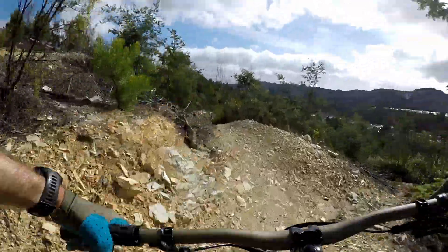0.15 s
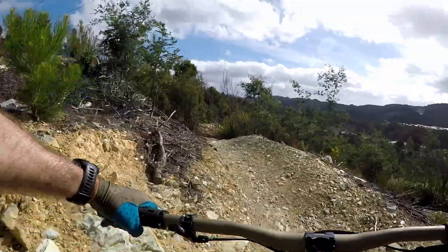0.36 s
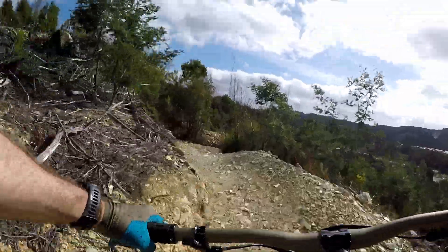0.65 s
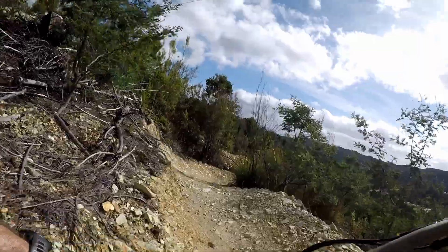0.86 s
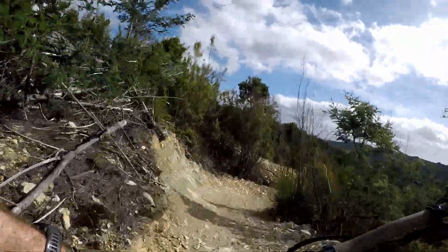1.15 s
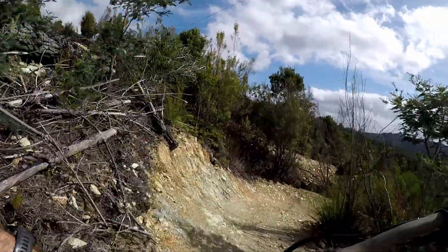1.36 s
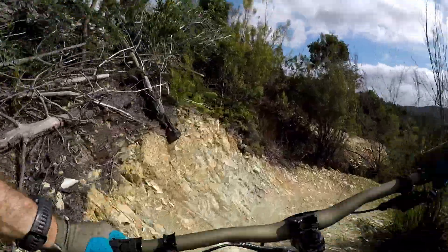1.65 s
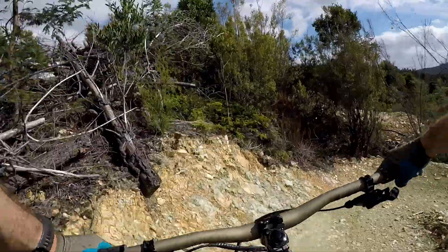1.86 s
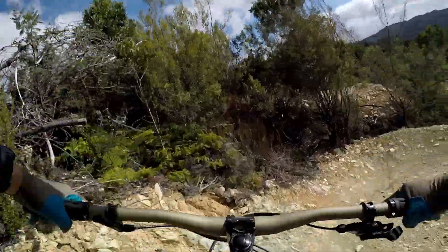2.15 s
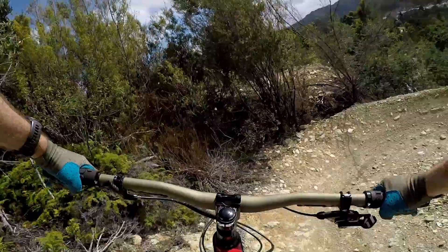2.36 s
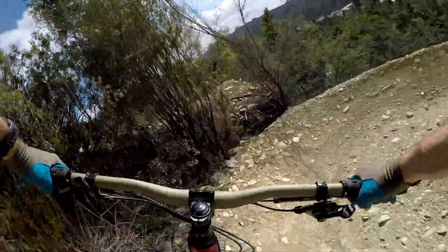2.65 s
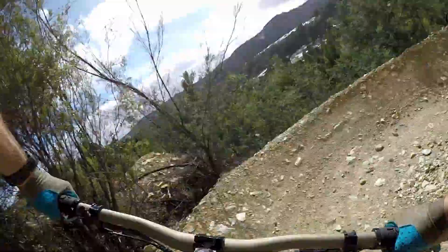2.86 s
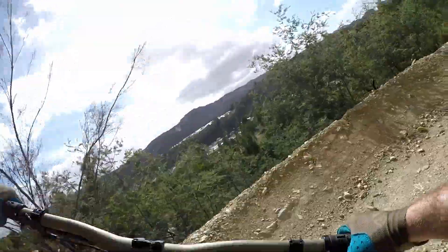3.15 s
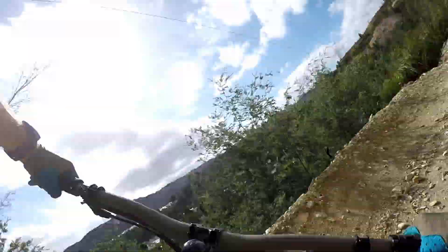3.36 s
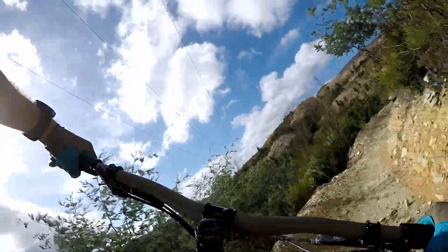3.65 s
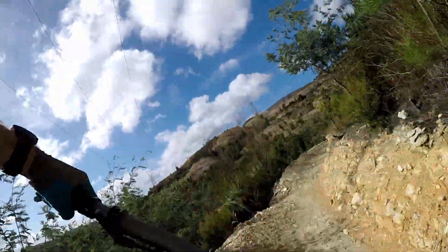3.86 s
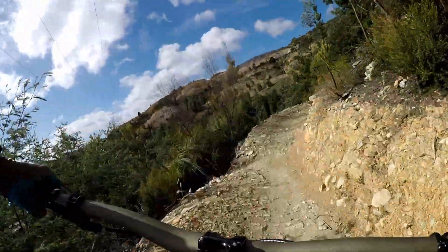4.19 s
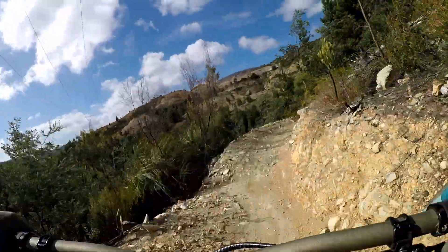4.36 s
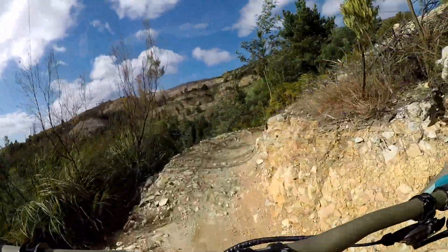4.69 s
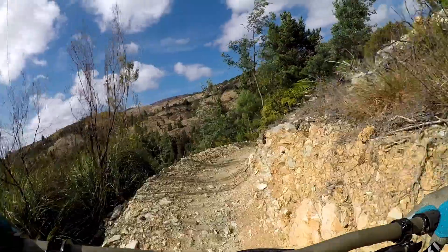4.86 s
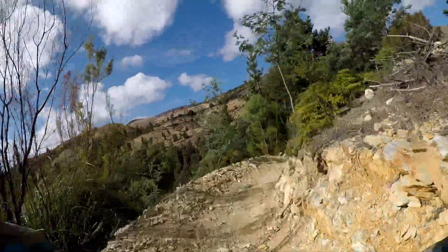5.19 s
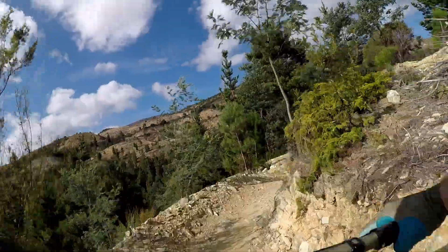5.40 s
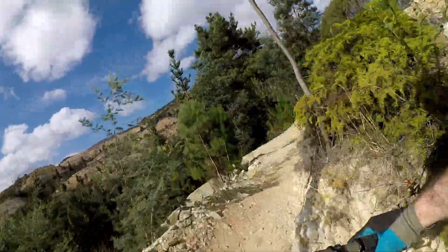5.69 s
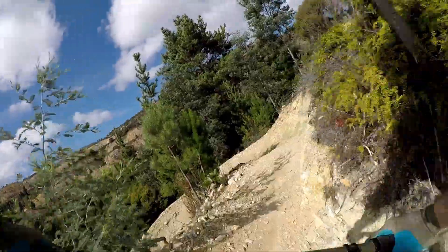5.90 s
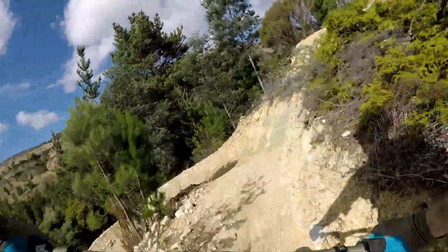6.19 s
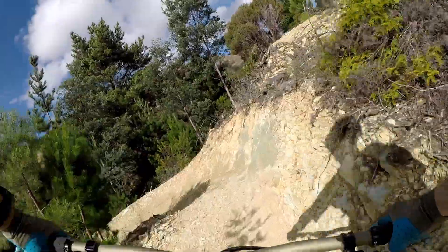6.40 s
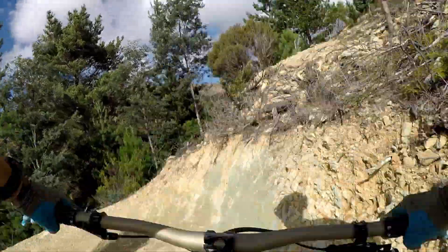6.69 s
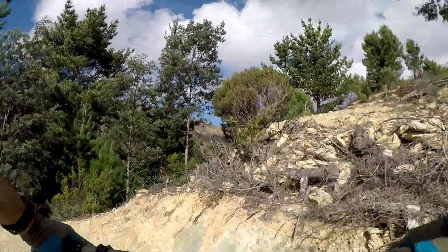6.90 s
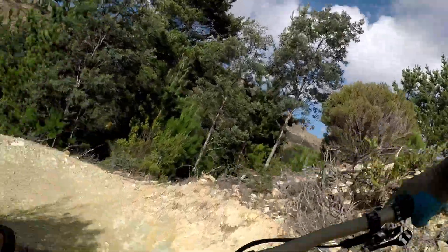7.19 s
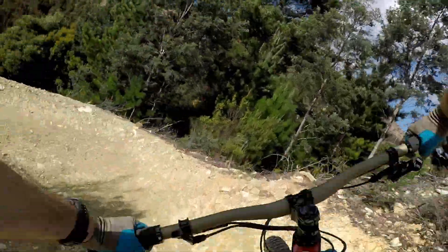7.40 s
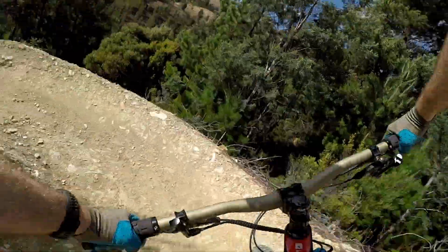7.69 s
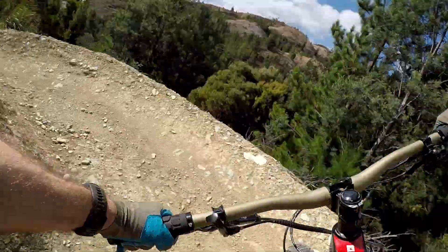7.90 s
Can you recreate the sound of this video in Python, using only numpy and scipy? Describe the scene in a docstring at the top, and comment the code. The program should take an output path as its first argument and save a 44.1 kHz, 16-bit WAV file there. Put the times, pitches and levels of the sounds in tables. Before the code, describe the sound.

Wind rumbles and loose stones crunch under bike tyres as bumps thud sharply; the hub later ticks rapidly before several heavy knocks.

```python
"""A mountain bike coasts down a gravel trail, heard from a camera on the rider's chest.
Bumps knock the camera mount (dispersed thuds, noise cracks) over wind buffeting and tyre crunch (shaped noise);
by 1.15 s the image closes to mono. From about 3 s the tyres rasp through the turns (noise into resonances).
The image widens again after 4.25 s and the freehub buzzes (clicks into resonances); hard knocks come near 7 s.
Stones ping off the frame throughout, and a limiter ducks the loudest peaks."""
import sys
import numpy as np
from scipy import signal
from scipy.fft import rfft, irfft, next_fast_len
from scipy.io import wavfile
from scipy.ndimage import uniform_filter1d, minimum_filter1d, map_coordinates

SR = 44100
rng = np.random.default_rng(int(sys.argv[2]) if len(sys.argv) > 2 else 0)


def file_out(sig):
    """Save sig as 16-bit WAV at sys.argv[1]."""
    # one column per channel
    cols = np.atleast_2d(sig).T
    # limit, then scale
    lim = np.clip(cols, -1, 1)
    pcm = np.round(lim * 32767).astype(np.int16)
    wavfile.write(sys.argv[1], SR, pcm)


N = 355005

# head wind, which follows the speed of the bike: (t/s, strength/dB)
WIND = [(0, -24.5), (.55, -22.5), (1.15, -23.5), (1.7, -22), (2.7, -25), (3.05, -26), (3.55, -29.5),
        (4.3, -34), (4.65, -33), (5.6, -33.5), (6.6, -38.5), (7.3, -33.5), (8.05, -33.5)]
REFERENCE_WIND_DB = -30  # wind strength at which wind-dependent levels take their base values
# stereo image: (t/s, width 0-1, where 0 is mono)
WIDTH = [(0, 0.99), (.4, 0.22), (.8, 0.06), (1.15, 0), (4.25, 0), (4.5, 0.37), (5, 0.62), (5.5, 0.85),
         (8.05, 0.87)]


def amp(db):
    """Logarithmic level: decibels to an amplitude ratio."""
    return 10 ** (np.asarray(db) / 20)


def unit(x):
    """Normalisation: scale to an rms value of 1."""
    return x / np.sqrt(np.mean(x ** 2) + 1e-20)


def along(points, hz):
    """Interpolation of (f/Hz, value) points along a logarithmic frequency axis."""
    f, v = np.transpose(points)
    return np.interp(np.log(hz + 1), np.log(f + 1), v)


def curves(rows):
    """Linear interpolation in time: one value per sample for each column after t/s."""
    s, *columns = np.transpose(rows)
    return [np.interp(np.arange(N) / SR, s, column) for column in columns]


def wobble(rate):
    """Slow random modulation: a smooth curve through `rate` Gaussian knots per second."""
    knots = rng.standard_normal(int(N * rate / SR) + 4)
    return map_coordinates(knots, [np.arange(N) * rate / SR])


def filtered(x, response):
    """Linear filtering: the spectrum of x times a complex response of frequency."""
    n = x.shape[-1]
    padded = next_fast_len(n + 8192, real=True)  # room for the filter's tail
    spectrum = rfft(x, padded) * response(np.fft.rfftfreq(padded, 1 / SR))
    return irfft(spectrum, padded)[..., :n]


def resonate(x, modes):
    """Modal resonance: parallel second-order modes (f/Hz, width/Hz, level/dB) of alternating sign."""
    def response(f):
        total = 0
        for k, (centre, width, db) in enumerate(modes):
            damping = 1j * f * width
            total = total + (-1) ** k * amp(db) * damping / (centre * centre - f * f + damping)
        return total
    return filtered(x, response)


def fade(t, t60):
    """Exponential decay, 60 dB down at t60."""
    return np.exp(-np.log(1000) * t / t60)


def swell(s, length):
    """Gaussian envelope: height 1 at time s, `length` seconds wide at half height."""
    return .5 ** ((2 * (np.arange(N) / SR - s) / length) ** 2)


def band(f, hz, octaves):
    """Gaussian band-pass gain around hz on a logarithmic frequency axis."""
    return np.exp(-.5 * (np.log2((f + 1) / hz) / octaves) ** 2)


def add(track, s, sound):
    """Superposition: mix a sound into a track at time s."""
    start = round(s * SR)
    sound = sound[..., max(0, -start):]
    part = track[..., max(0, start):][..., :sound.shape[-1]]
    part += sound[..., :part.shape[-1]]


def noise():
    """Two uncorrelated white noises."""
    return rng.standard_normal((2, N))


def contacts(rate, scatter_db, bed_db):
    """Random impact process: impulses of very unequal size over a bed of noise for countless tiny contacts."""
    size = amp(scatter_db * np.minimum(rng.standard_exponential(N), 4))
    impacts = (rng.random(N) < rate / SR) * size * noise()
    return unit(impacts) + amp(bed_db) * noise()  # bed level is relative to the impacts


def patchy(x, depth_db):
    """Time-frequency modulation: smooth random gain patches with an rms depth in dB."""
    z = signal.stft(x, nperseg=512)[2]
    field = uniform_filter1d(rng.standard_normal(z.shape[1:]), size=5, axis=0)
    field = uniform_filter1d(field, size=7, axis=1)
    return signal.istft(z * amp(depth_db * unit(field)), nperseg=512)[1][:, :N]


def spread(pair, spectrum):
    """Interchannel coherence: colour two unrelated signals as mid and side; the mid has rms 1."""
    # likeness of left and right: (f/Hz, correlation -1 to 1)
    likeness = [(30, 0.99), (110, 0.44), (380, 0.41), (700, -0.68), (1280, -0.41), (2300, 0.3), (3600, 1),
                (5400, 0.3), (8500, -0.53), (15000, -0.2)]

    def response(hz):
        angle = np.arccos(np.clip(along(likeness, hz), -1, 1)) / 2
        return amp(along(spectrum, hz)) * np.array([np.ones_like(hz), np.tan(angle)])

    mid, side = filtered(pair, response)
    return np.array([mid + side, mid - side]) / mid.std()


def roughness():
    """Ground excitation: the rise in dB that rough stretches of trail bring."""
    # rough stretches that shake the frame: (t/s, length/s, rise of the rumble/dB)
    ruts = [(0.576, 0.16, 11), (1.4, 0.13, 9), (2.23, 0.12, 17), (2.406, 0.16, 9.5), (2.72, 0.33, 14),
            (3.382, 0.074, 13), (3.804, 0.059, 8.5), (4.302, 0.16, 6), (4.87, 0.15, 6), (5.298, 0.86, 1.5),
            (5.646, 0.032, 10), (7.262, 0.057, 13.5)]
    return sum(db * swell(s, length) for s, length, db in ruts)


def tyres():
    """Granular crushing: knobs crush stones of four sizes under a load that flutters with the ground."""
    # how hard the tyres press into the gravel: (t/s, load level/dB)
    load = [(0, -50.5), (.12, -49), (.5, -41), (.78, -41), (1.45, -42), (2.15, -46), (2.45, -43),
            (2.7, -34.5), (2.95, -42), (3.6, -41), (3.83, -49), (4.17, -41.5), (4.45, -47), (4.65, -43),
            (4.92, -47.5), (5.45, -43.5), (7.7, -41), (8.05, -37.5)]
    # fine dust: (t/s, hiss level/dB)
    dust_hiss = [(0, -51.5), (.6, -59.5), (2.2, -56), (3.2, -56), (3.45, -49), (3.85, -57), (4.4, -57.5),
                 (4.63, -50), (4.9, -51.5), (4.95, -46), (5.4, -42), (7.3, -39), (7.7, -42.5),
                 (7.97, -38.5)]
    # relative spectra from coarse stones to dust: (f/Hz, level per Hz/dB)
    crunch_spectrum = [(200, 0), (450, 1.5), (750, -1), (1050, -3.5), (1350, -7), (1800, -11), (3500, -50)]
    gravel_spectrum = [(800, -8), (1450, 3.5), (1850, 4), (2350, 3), (2700, -1), (3050, 0), (3700, -7.5),
                       (6000, -25)]
    grit_spectrum = [(2200, -48), (3400, -1.5), (4400, 1.5), (5500, 3), (6100, -3), (6900, -19),
                     (8500, -112)]
    dust_spectrum = [(4500, -13), (6200, 1), (7300, 2), (8300, -5.5), (9700, -7), (11300, -15.5),
                     (13700, -15.5), (15500, -35)]
    (load_db,), (wind_db,), (dust_db,) = curves(load), curves(WIND), curves(dust_hiss)
    wind_rise = wind_db - REFERENCE_WIND_DB
    # speed throws the coarse stones about, so they grow with the wind and slightly with the ruts
    crunch_db = load_db + 0.5 + 0.95 * wind_rise + 0.078 * roughness()
    gravel_db = load_db + 0.5
    grit_db = load_db - 3 + 0.15 * wind_rise
    flutter = 0.68 * wobble(25) + 1.75 * wobble(90)

    coarse = patchy(contacts(rate=350, scatter_db=2.5, bed_db=7), depth_db=3.5)
    crunch = amp(crunch_db + 1.32 * flutter) * spread(coarse, crunch_spectrum)
    medium = patchy(contacts(rate=300, scatter_db=1.5, bed_db=12.0), depth_db=2.5)
    gravel = amp(gravel_db + 0.95 * flutter) * spread(medium, gravel_spectrum)
    fine = patchy(contacts(rate=1500, scatter_db=8.5, bed_db=12.0), depth_db=2.0)
    grit = amp(grit_db + 1.0 * flutter) * spread(fine, grit_spectrum)
    finest = patchy(contacts(rate=2100, scatter_db=14.0, bed_db=9.5), depth_db=2.5)
    dust = amp(dust_db + 0.61 * flutter) * spread(finest, dust_spectrum)
    return crunch + gravel + grit + dust


def scrub():
    """Frictional slip: each slip in a turn excites a band of resonances as a rasp; skids throw a spray of sand."""
    # sideways slips that throw sand: (t/s at the peak, length/s, spray level/dB)
    skids = [(.85, 0.46, -51), (2.684, 0.31, -42), (3.047, 0.23, -42.5), (4.146, 0.18, -50),
             (7.896, 0.18, -37)]
    # rasping slips: (t/s at the peak, length/s, level/dB, centre of the excited band f/Hz)
    rasps = [(3.21, 0.042, -41, 3250), (4.126, 0.17, -37, 4970), (4.167, 0.12, -40, 3400),
             (4.343, .2, -45, 4400), (4.588, .2, -42, 5450), (4.75, .26, -46, 3820)]
    # resonances of the rasp: (f/Hz, width/Hz, relative level/dB)
    rasp_modes = [(3330, 80, 12), (3540, 70, 10), (3890, 80, 6), (4780, 90, 14), (5170, 70, 8),
                  (5330, 100, 12.5), (5600, 160, 6), (6900, 600, -7)]
    # sand: (f/Hz, relative level per Hz/dB)
    spray_spectrum = [(4300, -29), (5200, -5), (5600, 8.5), (6050, 1), (6600, -7), (7800, -50)]
    spray_gain = sum(amp(db) * swell(s, length) for s, length, db in skids)
    spray = spray_gain * spread(noise(), spray_spectrum)
    chatter = resonate(contacts(rate=360, scatter_db=3, bed_db=-2), rasp_modes)
    rasp = np.zeros((2, N))
    for s, length, db, hz in rasps:
        slip = filtered(chatter, lambda f: band(f, hz, octaves=0.32) + .15)
        rasp += amp(db) * swell(s, length) * unit(slip)
    return amp(1.1 * wobble(40)) * (rasp + spray)


def rubble():
    """Granular collision: loose stones shoved aside by the tyre in the turn clatter against each other."""
    # shoves: (t/s, length/s, level/dB)
    shoves = [(2.551, .012, -27), (2.665, 0.018, -29), (2.688, .025, -34), (2.745, 0.04, -23),
              (2.869, .012, -27)]
    # clatter: (f/Hz, relative level per Hz/dB)
    clatter_spectrum = [(120, -4), (280, 3), (550, 11), (1200, -3), (2000, 1), (2600, -5), (3400, -12),
                        (6000, -48)]
    gain = sum(amp(db) * swell(s, length) for s, length, db in shoves)
    return gain * spread(contacts(rate=800, scatter_db=2.5, bed_db=-10), clatter_spectrum)


def freehub():
    """Periodic impact excitation: pawls drop into ratchet teeth and ring the hub's resonances."""
    # pawls: (t/s, click rate f/Hz, level/dB)
    pawls = [(0, 135, -90), (4.8, 135, -62), (5.3, 145, -41.5), (5.7, 104, -42.5), (6.35, 106, -39.5),
             (6.7, 83, -39.5), (7, 99, -45.5), (7.7, 92, -45), (8.05, 165, -45)]
    # hub resonances: (f/Hz, width/Hz, relative level/dB)
    hub_modes = [(2440, 320, 13), (5650, 470, 10), (7200, 230, -19), (9800, 1200, -19)]
    rate, level_db = curves(pawls)
    # each whole step of the accumulated phase is one tooth
    teeth = np.floor(np.cumsum(rate * (1 + 0.0056 * wobble(5.1))) / SR)
    clicks = np.diff(teeth, prepend=0) * amp(1.9 * wobble(90))
    burst_s = .002  # decay time constant
    bursts = signal.lfilter([1], [1, -np.exp(-1 / (SR * burst_s))], clicks) * noise()
    return amp(level_db) * unit(resonate(bursts, hub_modes))


def stones():
    """Impact excitation of modes: a flung stone grazes the frame and rings the modes near its own pitch."""
    # stones: (t/s, strength/dB, centre of the clack f/Hz, t60 of the graze/s)
    strikes = [(0.712, -23, 900, .02), (2.35, -22, 3800, 0.031), (2.648, -25, 1130, 0.034),
               (2.6715, -3, 2400, .022), (2.724, -14, 1500, 0.015), (2.736, -22, 1900, .02),
               (2.744, -21, 1750, .016), (2.752, -17, 1700, .02), (3.1645, -12, 2380, 0.034),
               (3.178, -22, 3200, .07), (3.194, -22, 1800, 0.043), (3.326, -25, 1690, .022),
               (3.425, -23.5, 4890, 0.018), (3.669, -15, 4800, 0.018), (3.958, -22, 800, .03),
               (3.965, -28, 2000, .02), (4.024, -21.5, 5000, 0.016), (4.179, -23, 3940, .022),
               (4.547, -26, 4900, 0.018), (4.627, -22, 5040, 0.016), (4.663, -18.5, 4930, .015),
               (4.723, -20.5, 5000, 0.023), (5.339, -24, 4300, .012), (5.49, -24, 2800, .014),
               (5.5502, -21.5, 1750, .012), (5.681, -22.5, 1450, .018), (5.704, -24, 1500, .016),
               (5.71, -22, 3000, .014), (5.728, -27, 2500, 0.011), (5.777, -17, 1650, .022),
               (5.779, -19, 3000, .018), (5.922, -24, 2400, .016), (6.1985, -16, 1300, 0.0061),
               (7.494, -21.5, 2100, 0.099), (7.805, -13, 2500, 0.041), (8.016, -16.5, 2500, 0.032)]
    # the frame: (f/Hz, width/Hz, relative level/dB)
    frame_modes = [(775, 12, 15), (1190, 410, -0.5), (1420, 65, 5), (1750, 300, 2), (2190, 630, 2.5),
                   (2870, 410, 3), (3180, 170, 6), (4230, 2000, -5.5), (5550, 1000, 0)]
    out, t = np.zeros((2, N)), np.arange(SR // 5) / SR
    for s, db, hz, t60 in strikes:
        attack = 1 - np.exp(-t / (0.03 * t60))
        decay = fade(t, t60) + 0.07 * fade(t, 9 * t60)  # the graze, then a faint longer tail
        graze = rng.standard_normal((2, len(t))) * attack * decay
        contact = filtered(graze, lambda f: band(f, hz, octaves=0.49) + 0.16)
        # the frame lies straight ahead, so most of its sound is common to both ports
        mid, side = resonate(contact, frame_modes) * [[1], [.55]]
        add(out, s, amp(db - 2.0) * np.array([mid + side, mid - side]) / np.abs(mid).max())
    return out


def knocks():
    """Dispersive impact: a blow cracks and sways the mount; low pitches of its thud arrive later than high."""
    # bumps that bottom out the mount: (t/s, blow level/dB, hardness/dB per octave,
    # crack energy/dB re blow, sway level/dB re blow, rebound delay t/s, rebound strength 0-1)
    blows = [(0, -6.5, -0.5, 11.5, 8.5, 0.00193, 0), (0.315, -8.5, -1, 4.5, -20, 0.0027, 0.36),
             (0.5482, -5.5, -1.5, 1, -4, 0.0025, 0.33), (0.6386, -10.5, -1.5, 4, -4, 0.0024, 0.3),
             (0.74, -4.5, -2.5, 1.5, -10, 0.0024, 0.4), (0.8523, -9, -2, -1, -18, 0.0026, 0.53),
             (.949, -4.5, -3, -0.5, 0, 0.0028, 0.37), (1.057, -14, -2.8, 0, -15, 0.0024, .3),
             (1.448, -8, -2.5, -0.5, -14, 0.0018, 0.24), (1.679, -10, -1.2, -1, 2, 0.0014, 0.54),
             (1.9174, -5, 2, 4, -23, 0.0016, 0.73), (2.0821, -1, 0.2, 4, -7, 0.0017, 0.9),
             (2.214, -12, -0.5, 7, 11, 0.0015, 0.6), (2.306, -9.5, -1.2, 6, 10.5, .0015, 0.66),
             (2.4367, -9, -1.9, 8.5, 3, 0.002, .3), (2.5483, -5, -1.1, 6, -12, 0.0038, .3),
             (2.7102, -1, -2, 5.5, -3, 0.00243, 0.46), (2.871, 0.5, -3.5, -4, -10, 0.0027, 0.56),
             (6.654, -17.5, 0, 3, -15, 0.0029, 0.2), (6.8803, -4.5, 3, 0, -3, 0.0029, 0.44),
             (7.1177, 5.5, 2, -2, -8, 0.0028, 0.32), (7.4084, 10, 1.5, 4.5, 4, 0.0028, 0.35),
             (7.5971, 14, 2.5, 4.5, 1, 0.0027, 0.1), (7.7456, -13.5, -1.5, -2, -2, 0.0025, 0.23)]
    # dull thud of the mount: (f/Hz, relative level per Hz/dB)
    thud_spectrum = [(20, -20), (45, -8), (120, 2), (200, 0), (320, -7.5), (470, -6), (580, -13),
                     (750, -13), (850, -18.5), (1020, -11.5), (1280, -12), (1800, -30.5), (3000, -48),
                     (6000, -69)]
    # dry crack of the mount: (f/Hz, relative level per Hz/dB)
    crack_spectrum = [(200, -23), (800, 1.5), (1700, 5), (2200, -4.5), (2750, -2), (3050, 2.5),
                      (3500, -3.5), (4000, 4.5), (4900, -4.5), (5900, -3), (6700, -15.5), (10000, -20),
                      (15000, -29)]
    lead = .01  # seconds of room ahead of each blow
    out, early = np.zeros((2, N)), np.arange(SR // 5) / SR - lead
    t, f = np.maximum(early, 0), np.fft.rfftfreq(len(early), 1 / SR)
    # group delay of the thud: delay_s at ref_hz, growing as frequency to the power -dispersion
    delay_s, ref_hz, dispersion = .0021, 1000, .65
    power = 1 - dispersion
    travel = np.exp(-2j * np.pi * (lead * f + delay_s * ref_hz * (f / ref_hz) ** power / power))
    octaves = np.log2(np.clip(f, 100, 2000) / 300)
    bands = np.geomspace(150, 3000, 14)
    for s, db, hardness, crack_db, sway_db, rebound_s, rebound_share in blows:
        width = np.interp(s, *np.transpose(WIDTH))
        top_hz = 9000 * (1 - 0.62 * width)  # the crack is duller where the image is wide
        # a harder blow is brighter, and no two land on quite the same spot
        spot_db = np.interp(f, bands, rng.standard_normal(len(bands)))
        rebound = 1 + rebound_share * np.exp(-2j * np.pi * f * rebound_s)
        thud = irfft(amp(along(thud_spectrum, f) + hardness * octaves + spot_db) * travel * rebound)
        sway = np.sin(2 * np.pi * 165 * t) * (1 - np.exp(-t / 0.0067)) ** 2 * fade(t, 0.085)
        snap = rng.standard_normal(len(t)) * (1 - np.exp(-t / 0.00095)) ** 2 * fade(t, 0.016)
        crack = filtered(snap, lambda hz: amp(along(crack_spectrum, hz)) / (1 + (hz / top_hz) ** 6))
        crack = crack / np.linalg.norm(crack)  # unit energy
        hit = amp(db) * (thud / np.abs(thud).max() + amp(sway_db) * sway + amp(crack_db) * crack)
        # the wider the image, the later (to .46 ms) and weaker (to -3 dB) the right port hears the blow
        add(out[0], s - lead, hit)
        add(out[1], s - lead + .00046 * width, amp(-3.0 * width) * hit)
    return out


def thumps():
    """Damped oscillation: soft bumps set the mount swaying for a few cycles."""
    # soft bumps: (t/s, strength/dB, sway f/Hz, t60/s)
    bumps = [(0.771, -11.5, 150, 0.045), (2.222, -12.5, 207, 0.21), (2.728, -11, 190, .04),
             (2.956, -11.5, 149, 0.061), (3.157, -13, 125, 0.081), (6.252, -18, 141, 0.09),
             (6.333, -19, 141, 0.074), (6.417, -12.5, 153, .064), (6.912, -12, 149, 0.071),
             (7.329, -12, 136, 0.063)]
    out, t = np.zeros(N), np.arange(SR // 4) / SR
    for s, db, hz, t60 in bumps:
        sway = np.sin(2 * np.pi * hz * t) * (1 - np.exp(-t / 0.0022)) * fade(t, t60)
        add(out, s, amp(db + 7.5) * sway)
    return out


def wind():
    """Turbulent pressure: eddies beat on the microphone ports, rough ground shakes the frame; wind lifts all."""
    # gusts that hit the ports: (t/s, length/s, rise of the eddies/dB, rise of the buffeting/dB)
    gusts = [(1.912, 0.84, 5, 3.5), (2.527, 0.18, 2.5, 4), (2.808, 0.045, 10.5, 5.5),
             (2.997, 0.079, 8.5, 10), (3.367, 0.26, 9.5, -1), (3.762, 0.12, 5.5, 1), (4.21, 0.24, 6.5, 6.5),
             (4.532, 0.05, 12, -3), (5.589, 0.14, 3, 12), (5.96, 0.1, 9.5, 6), (6.36, 0.13, 7.5, 11),
             (6.79, 0.34, 10.5, 8), (6.905, 0.08, -8, 4.5), (7.272, 0.09, 1, 13), (7.604, 0.48, 11.5, 5),
             (8.045, 0.054, 16, 4.5)]
    # relative spectra: (f/Hz, level per Hz/dB)
    eddy_spectrum = [(8, 3.5), (22, 5), (40, -2), (58, -12), (90, -35), (200, -64)]
    buffet_spectrum = [(35, -14), (60, 5), (95, 1.5), (135, 2), (180, -3), (300, -30), (900, -87)]
    rumble_spectrum = [(90, -33), (150, -0.5), (185, -2.5), (240, 0), (320, -6.5), (400, -10), (490, -10.5),
                       (700, -25.5), (2000, -71)]
    wind_db, = curves(WIND)
    wind_rise = wind_db - REFERENCE_WIND_DB
    eddy_db = -25 + 0.4 * wind_rise + sum(db * swell(s, length) for s, length, db, _ in gusts)
    buffet_db = wind_db + sum(db * swell(s, length) for s, length, _, db in gusts)
    rumble_db = -35.5 + 0.48 * wind_rise + roughness()
    shake = wobble(45)  # shared by buffeting and rumble
    eddies = amp(eddy_db + 1.26 * wobble(8.4)) * spread(noise(), eddy_spectrum)
    buffet = amp(buffet_db + 2.97 * shake + 1.2 * wobble(35)) * spread(noise(), buffet_spectrum)
    rumble = amp(rumble_db + 1.47 * shake) * spread(patchy(noise(), depth_db=2), rumble_spectrum)
    return eddies + buffet + rumble


def scene():
    """Superposition of all sources; scaling the side signal sets the stereo width."""
    bike = tyres() + scrub() + freehub() + stones() + rubble()
    # the bike leans slightly to the left: +0.8 dB left, -0.8 dB right
    left, right = wind() + thumps() + bike * amp([[.8], [-.8]])
    width = np.clip(curves(WIDTH)[0], 0, 1)
    mid, side = (left + right) / 2, width * (left - right) / 2
    return np.array([mid + side, mid - side]) + knocks()


def record(dry):
    """Peak limiting: gain ducks at once on peaks and recovers exponentially; then the camera's band limit."""
    ceiling, release_s, top_hz = .92, 0.047, 15200
    over_db = 20 * np.log10(np.maximum(np.abs(dry).max(axis=0) / ceiling, 1))
    clock = np.arange(N) / SR / release_s
    # each overshoot holds the gain down and dies away exponentially
    duck_db = np.exp(np.maximum.accumulate(np.log(over_db + 1e-9) + clock) - clock)
    # a centred 2 ms minimum and mean make the gain move smoothly, just ahead of the peak
    gain = uniform_filter1d(minimum_filter1d(amp(-duck_db), size=89), size=89)
    return filtered(dry * gain, lambda hz: hz < top_hz)


dry = scene()
out = record(dry)
file_out(out)
```